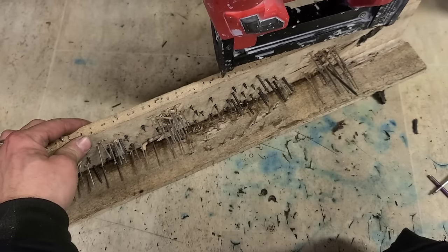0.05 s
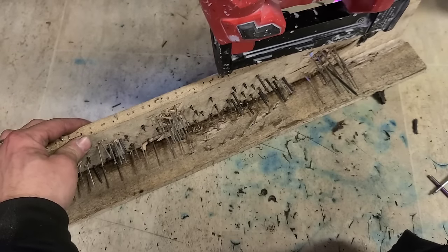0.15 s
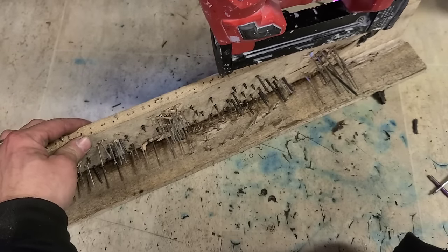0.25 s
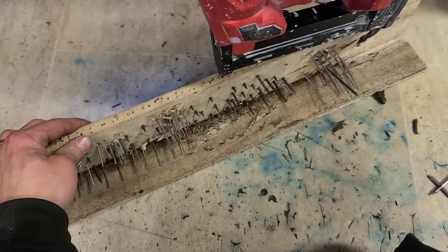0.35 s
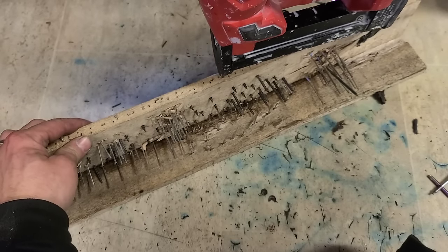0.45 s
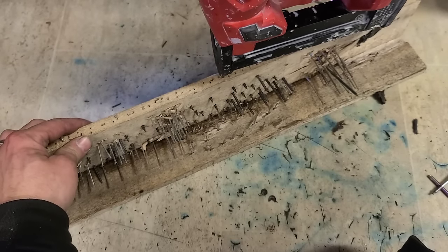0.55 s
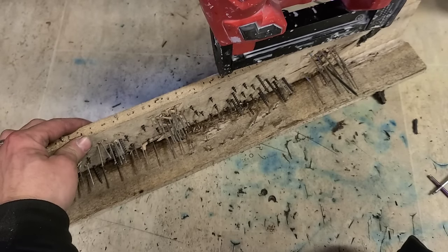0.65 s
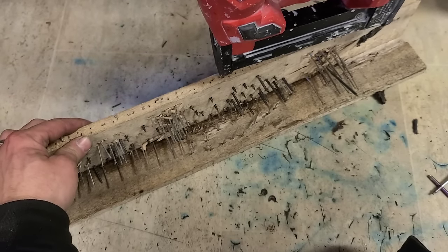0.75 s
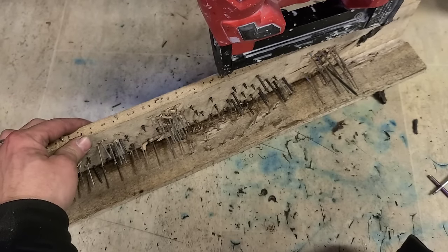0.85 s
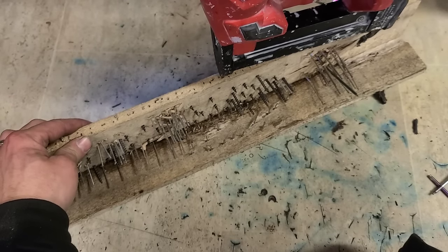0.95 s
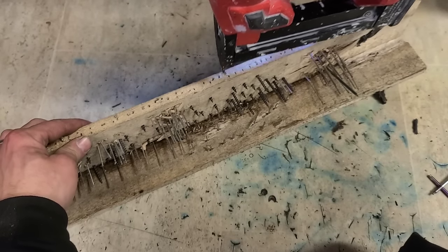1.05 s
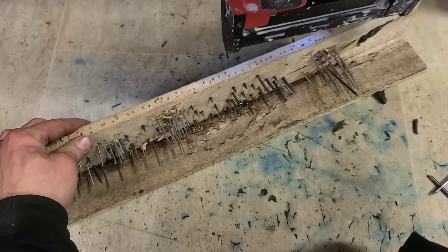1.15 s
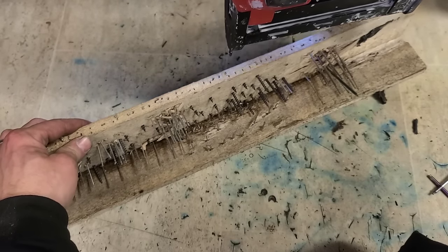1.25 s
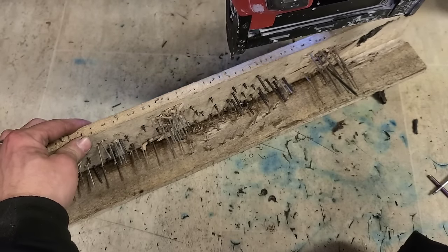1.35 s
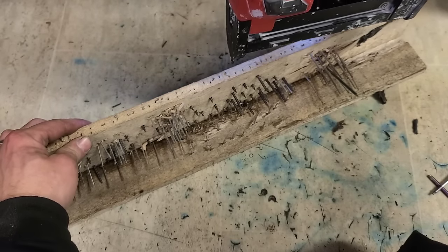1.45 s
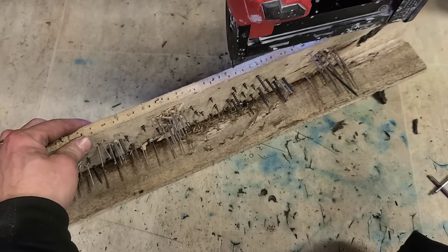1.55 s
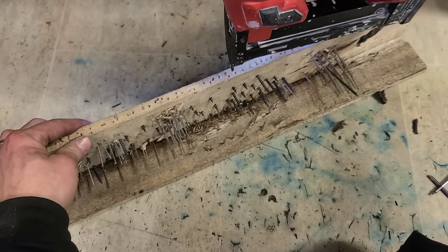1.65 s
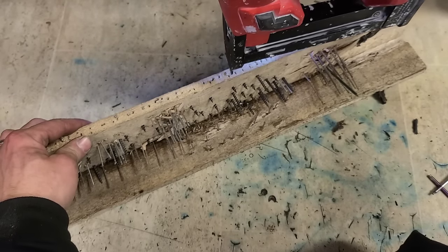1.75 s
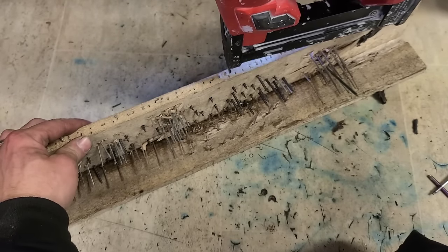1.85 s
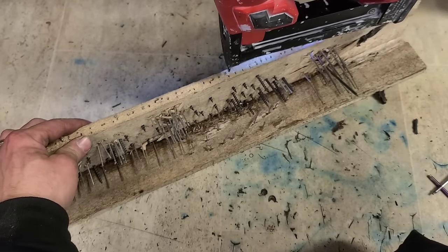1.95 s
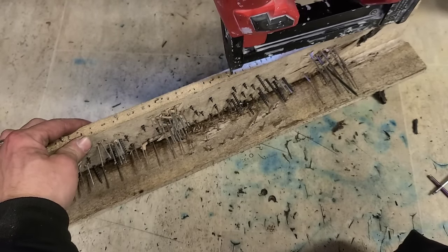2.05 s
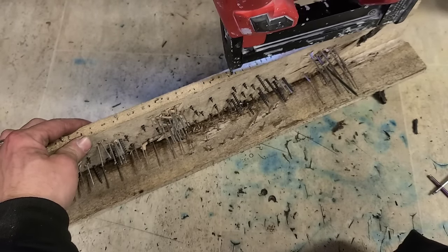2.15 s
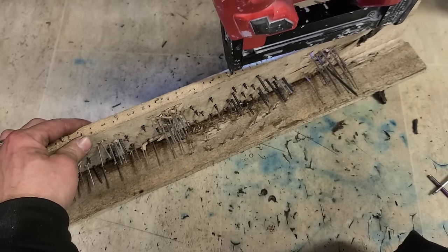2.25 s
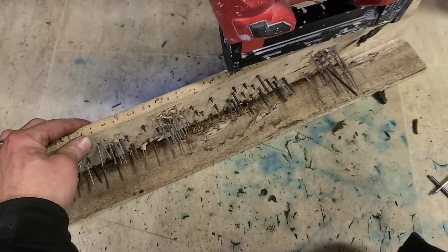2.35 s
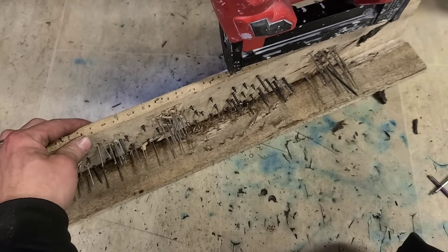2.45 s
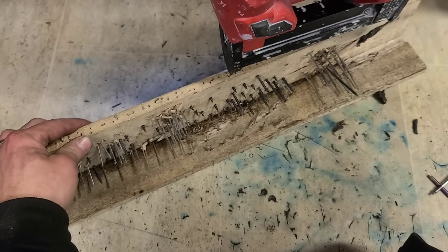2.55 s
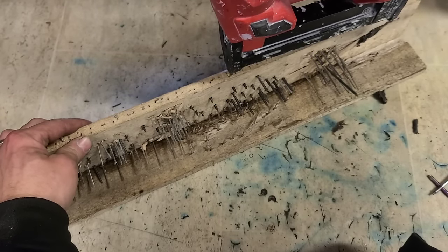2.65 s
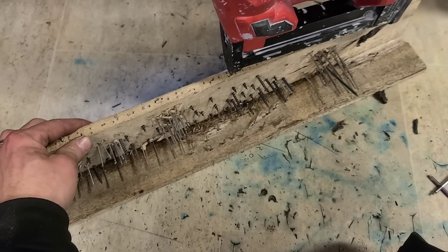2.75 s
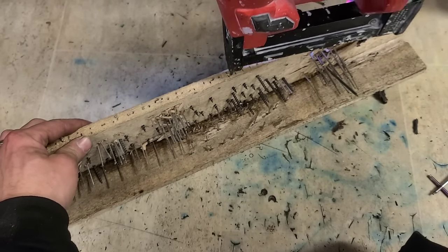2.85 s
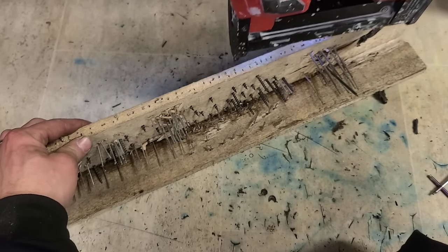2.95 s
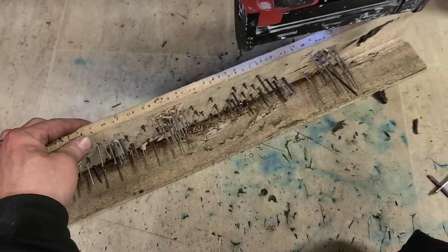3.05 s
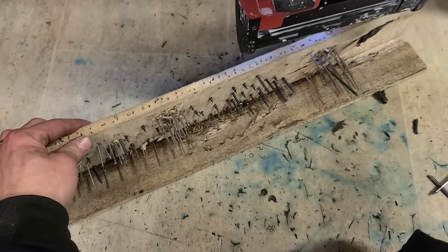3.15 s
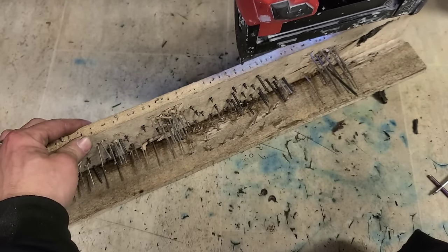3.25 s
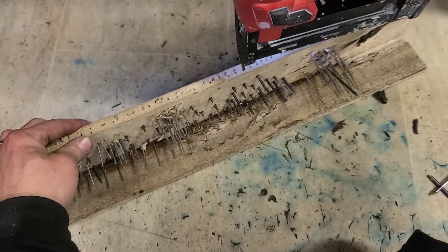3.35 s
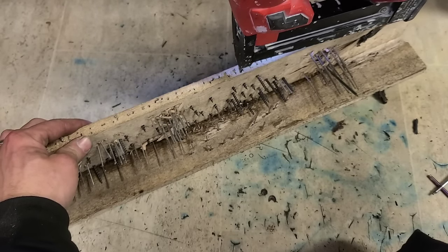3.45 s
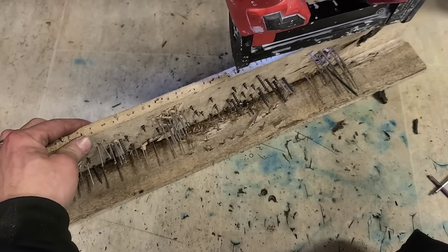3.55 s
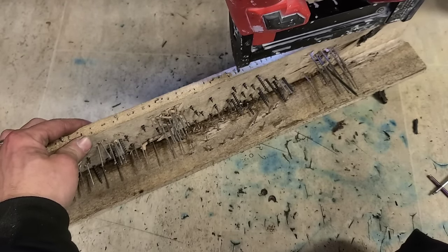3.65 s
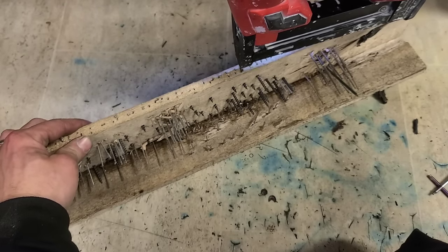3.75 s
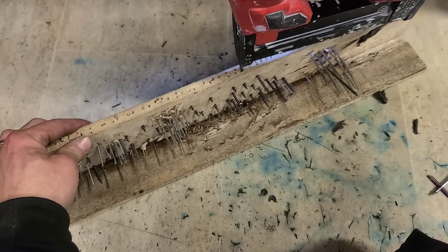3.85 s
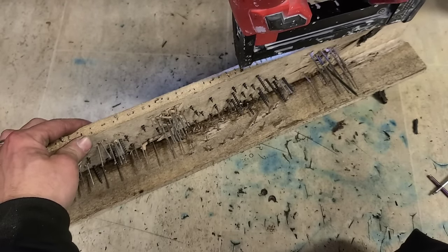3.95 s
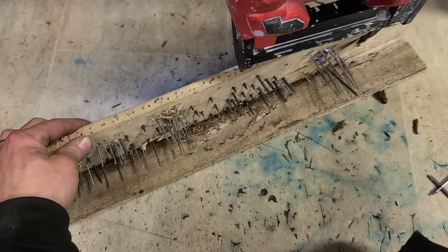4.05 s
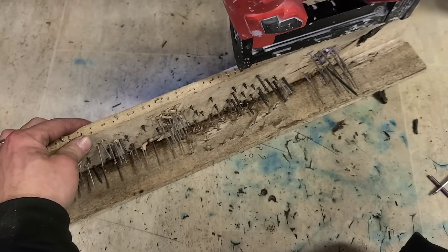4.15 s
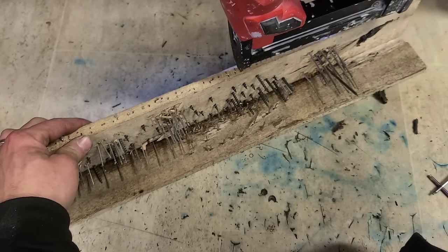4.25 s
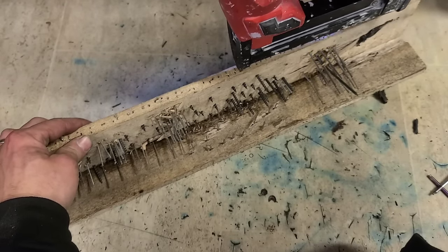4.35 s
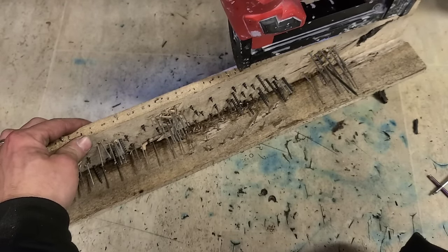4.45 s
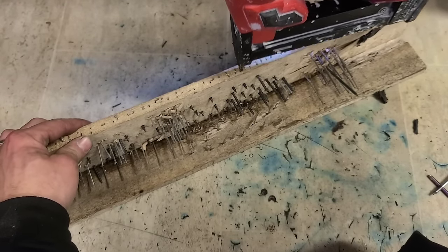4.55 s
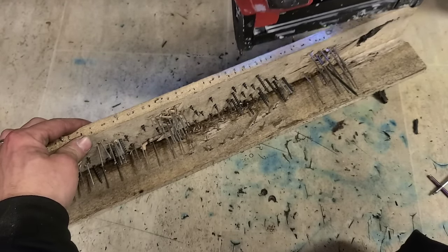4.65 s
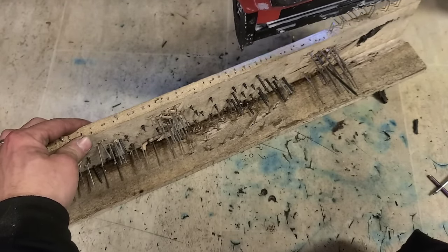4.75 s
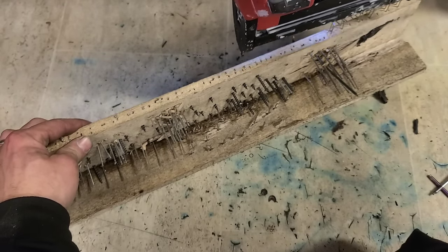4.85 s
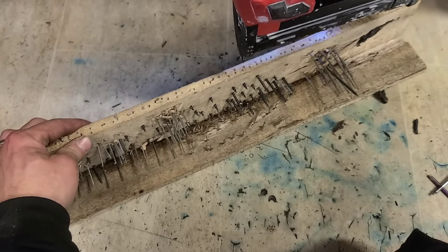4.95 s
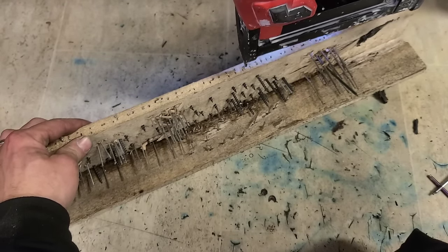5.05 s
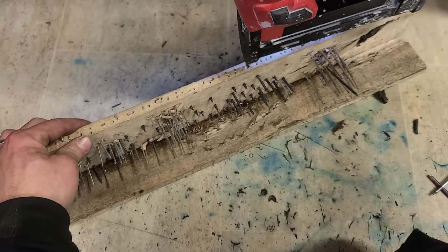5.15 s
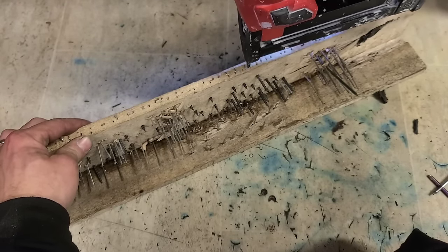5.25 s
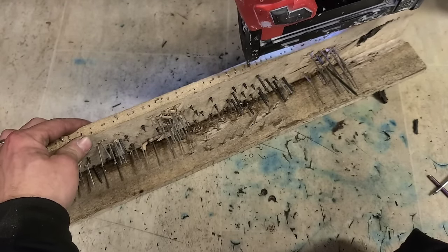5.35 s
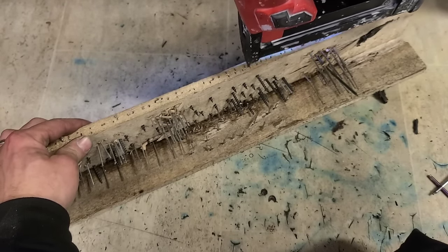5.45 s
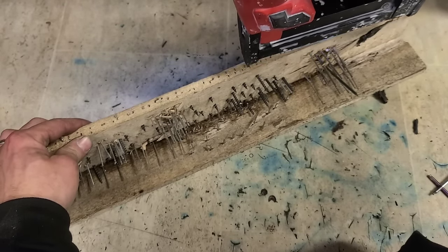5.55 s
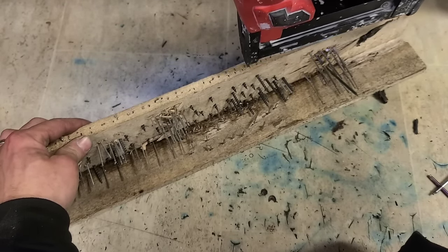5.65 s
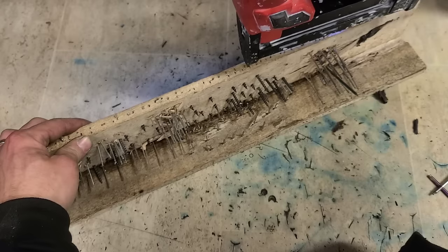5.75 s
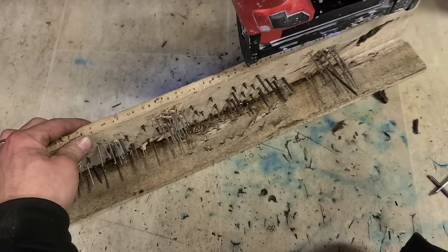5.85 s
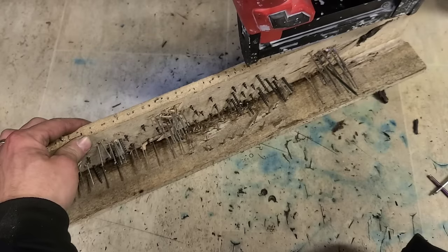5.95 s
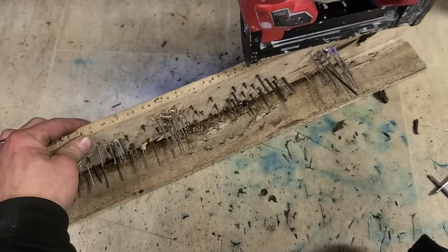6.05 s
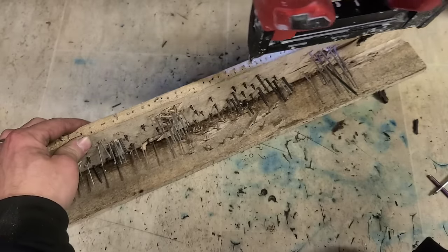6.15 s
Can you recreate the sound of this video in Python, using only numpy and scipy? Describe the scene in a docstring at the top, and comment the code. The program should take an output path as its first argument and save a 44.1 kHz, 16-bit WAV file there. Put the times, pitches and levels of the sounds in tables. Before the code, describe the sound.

A cordless stapler fires four sharp shots into wood, each with a brief motor whine, between soft thuds and trigger clicks.

```python
"""Cordless stapler in a small workshop

Two microphones close to a workbench: a stapler fires four times into a board, over a faint hum.
Each time its nose is set down with a thud and the trigger is squeezed. A geared motor races up
against the piston, the driver slams the staple home, the motor whines on to cock the tool, and the
trigger clicks back. The tool's steel, the bench and the room ring after each shot."""
import sys
import numpy as np
from scipy import signal
from scipy.fft import rfft, irfft
from scipy.io import wavfile

SR = 44100
rng = np.random.default_rng(int(sys.argv[2]) if len(sys.argv) > 2 else 0)


def transcribe(u):
    """Save the signal u as a 16-bit wav file named by the first command-line argument.

    u: samples, shape (n,) or (channels, n), limited to [-1, 1]; the rate is SR.
    q: integer samples, one column per channel.
    """
    v = np.clip(np.atleast_2d(u).T, -1, 1)
    q = np.round(v * 32767).astype(np.int16)
    wavfile.write(sys.argv[1], SR, q)


N = 273854

# the four shots: (motor start [s], level [dB], tooth rate factor [ratio])
SHOTS = [(0.721, 1.18, 0.99), (2.608, 0, 0.99), (4.297, -0.44, 0.98), (5.8017, -1.46, 0.99)]
# metal blows in each shot: (time after motor start [s], level [dB], t60 [s], treble lift [dB])
METAL_BLOWS = [(.001, -13, 0.023, 0.5), (.0073, -6, .026, -1.5), (.036, -16, .022, 0),
               (.046, -7.5, 0.025, 4.5), (0.0486, -9, .02, -5), (.124, -17, .035, 19), (.146, -23, .03, 12),
               (.164, -19, .0284, 6), (.171, -19.5, 0.03, 2)]
# struck steel: (frequency [Hz], level [dB])
STEEL_SPECTRUM = [(200, -22.5), (330, -14.5), (600, -16), (900, -16.5), (1300, 3.5), (1700, 6.5),
                  (2300, -10.5), (3100, 1), (4500, -4.5), (6400, -5), (8800, -12.5), (12000, -7.5),
                  (16000, -14)]
FIRE_S = .0468  # the driver lands this long after the motor starts


def stapler():
    """The tool, close up: each shot is a motor run with the blows of catch, driver and ratchet."""
    out = np.zeros((2, N))
    for s, db, speed in SHOTS:
        add(out, s, amp(db) * motor(speed))
        add(out, s + FIRE_S, amp(db - 5) * driver_crack(width_s=.0005))
        for after, blow_db, t60, lift_db in METAL_BLOWS:
            colour = [(hz, level + lift_db * np.log2(1 + hz / 7000)) for hz, level in STEEL_SPECTRUM]
            add(out, s + after, amp(db + blow_db) * burst(colour, t60, rise_s=.0007))
    return out


def driver_crack(width_s, size=600):
    """The driver slams the staple home: one short pressure pulse."""
    u = np.arange(size) / SR / width_s
    return -(1 - u) * np.exp(-u) * (1 - np.exp(-6 * u))


# partials of the gears: (multiple of the tooth rate [ratio], level [dB])
WHINE_PARTIALS = [(1, -2.5), (2, -4.5), (2.4, -11.5), (3, -13.5), (4, -11), (5, -10), (6, -13.5), (7, -22)]


def gear_whine(teeth):
    """Partials glide across the casing's modes, fluttering differently at each microphone."""
    size = len(teeth)
    whine = np.zeros((2, size))
    for microphone in whine:
        for k, db in WHINE_PARTIALS:
            flutter = 1 + .6 * (wander(110, size) + 1j * wander(110, size))
            microphone += amp(db) * (flutter * np.exp(2j * np.pi * (k * teeth + rng.random()))).real
    return unit(whine)


# clattering gears and rumbling casing: (frequency [Hz], level [dB])
GEAR_SPECTRUM = [(350, -26), (650, -6.5), (900, -9), (1250, 1), (1750, -6), (2200, 0), (3000, -1),
                 (3800, -4), (4400, -7), (7200, -6), (8600, -14), (10000, -16), (12000, -16), (16000, -13)]
CASING_SPECTRUM = [(60, -22.5), (120, 11.5), (170, 2), (240, -7), (380, 3), (500, 0), (650, -7.5),
                   (900, -14), (1500, -39.5)]
START_HZ, TOP_HZ, LOADED_HZ = 319.9, 1986.4, 1500  # tooth rate, before each shot's factor
TOP_S, COCK_S, COAST_S, BRAKE_S = .056, .12, .161, .17  # after motor start; power is cut at COAST_S
SAG_S, COAST_HZ_PER_S, COAST_DB_PER_S, BRAKE_DB_PER_S = .059, 15000, 450, 1098


def motor(speed, size=9000):
    """The motor races up against the piston, is relieved by the shot, sags while cocking, and brakes."""
    t = np.arange(size) / SR
    coasting, braking = np.maximum(t - COAST_S, 0), np.maximum(t - BRAKE_S, 0)
    racing_hz = START_HZ + (TOP_HZ - START_HZ) * t / TOP_S
    sagging_hz = LOADED_HZ + (TOP_HZ - LOADED_HZ) * np.exp(-np.maximum(t - TOP_S, 0) / SAG_S)
    hz = np.maximum(np.minimum(racing_hz, sagging_hz) - COAST_HZ_PER_S * coasting, 1)
    drive = hz / TOP_HZ * amp(-BRAKE_DB_PER_S * braking)
    teeth = np.cumsum(hz * speed * (1 + .006 * wander(300, size))) / SR

    # the gears strain before the shot and again as the tool cocks
    strain = np.minimum(t / .023, 1) * np.exp(-np.maximum(t - FIRE_S, 0) / .01)
    cocking = np.clip((t - COCK_S) / .017, 0, 1)
    shake = np.exp(-((t - FIRE_S - .0075) / .0087) ** 2)  # hardest just after the driver lands
    whine_db = -24.5 + 5.5 * cocking - COAST_DB_PER_S * coasting  # without power the whine fades first
    gears_db = -23.5 + 12 * strain + 2 * cocking
    casing_db = -29.5 + 16 * shake

    whine = amp(whine_db) * gear_whine(teeth)
    meshing = 1 + .4 * np.cos(2 * np.pi * teeth)
    clatter = unit(amp(3 * wander(400, size)) * meshing)  # uneven, once at each mesh
    rumble = drive * flicker(3.4, 120, size)
    gears = amp(gears_db) * clatter * noise(GEAR_SPECTRUM, size)
    casing = amp(casing_db) * rumble * noise(CASING_SPECTRUM, size)
    return drive * (whine + gears + casing)


# the tool's steel parts: (frequency [Hz], gain at resonance [dB])
STEEL_MODES = [(1073, -10.5), (1320, 0), (1720, -7), (1959, -6.5), (2502, -9.5), (2656, -4), (2907, -5.5),
               (3150, -0.5), (3230, -2), (3298, -6), (3748, -3), (4740, -4.5), (6290, -2), (7830, 1.5),
               (7890, 1.5), (7960, 1), (9380, 2.5)]


def steel_ring(x, t60=.21):
    """Steel parts pick up the blows and the passing whine, and ring on after the motor stops."""
    radius = np.exp(-np.log(1000) / (t60 * SR))
    out = np.zeros_like(x)
    for hz, db in STEEL_MODES:
        pole = radius * np.exp(2j * np.pi * hz / SR)
        out += 2 * amp(db) * signal.lfilter([1 - radius], [1, -pole], x + 1e-12).real
    return out


# the nose lands: (time [s], knock [dB], thud [dB], scrape [dB], tip's lead [s], tip's tick [dB])
NOSE_LANDINGS = [(0.1459, -21.5, -7, -43.5, .018, -57), (2.2952, -21.5, -6, -41, .014, -50.5),
                 (4.0128, -29, -9, -49, .014, -52), (5.4856, -29.5, -10.5, -50, 0.033, -60)]
# the tool is tapped and shifted while aiming: (time [s], knock [dB], tick [dB], thud [dB])
AIMING_TAPS = [(0.064, -46.5, -77, -50.5), (0.594, -43, -62, -47), (2.083, -41, -57.5, -28.5),
               (2.125, -42, -48.5, -59.5), (2.246, -44, -72, -59.5), (3.348, -61, -89, -67),
               (3.81, -43.5, -52, -39.5), (3.845, -46.5, -88, -59), (3.931, -46, -70, -36),
               (4.076, -40.5, -79.5, -54.5), (5.255, -52, -57.5, -60.5), (5.348, -62, -85, -40.5),
               (5.414, -45.5, -78, -41)]
# the board's knock: (frequency [Hz], level [dB])
BOARD_SPECTRUM = [(100, -15), (220, -1.5), (380, 8), (550, -7.5), (850, -1), (1400, -4.5), (2600, -3),
                  (3300, -11), (4500, -20.5), (9000, -41)]


def handling():
    """The nose scrapes and knocks on the wood as its safety tip slides in; light taps while aiming."""
    out = np.zeros((2, N))
    for s, knock_db, _, scrape_db, lead_s, tip_db in NOSE_LANDINGS:
        grate = nose_scrape(fade_s=.017)
        add(out, s - grate.shape[1] / SR / 2, amp(scrape_db) * grate)
        add(out, s, amp(knock_db) * burst(BOARD_SPECTRUM, t60=.035, rise_s=.0005))
        add(out, s - lead_s, click(knock_db - 13.5, tip_db))  # the tip touches
        add(out, s + .013, click(knock_db - 10, knock_db - 25))  # and latches
    for s, knock_db, tick_db, _ in AIMING_TAPS:
        add(out, s, click(knock_db, tick_db))
    return out


def nose_scrape(fade_s, size=9000):
    """The steel nose grates on the wood as it lands and settles: a grainy swell."""
    t = np.arange(size) / SR
    swell = np.exp(-abs(t - t[-1] / 2) / fade_s) * signal.windows.tukey(size)
    return swell * flicker(5.5, 250, size) * noise(PLASTIC_SPECTRUM, size)


# the finger takes up the trigger's slack: (time [s], knock [dB], tick [dB])
TRIGGER_GRIPS = [(.646, -42.5, -66.5), (2.533, -40.5, -52.5), (4.233, -44, -66), (5.722, -43.5, -65.5)]
# it presses home, and later lets go: (time [s], knock [dB], thud [dB])
TRIGGER_PRESSES = [(.663, -39.5, -30.5), (2.563, -36.5, -27), (4.253, -53.5, -36.5), (5.738, -46, -33)]
TRIGGER_RELEASES = [(1.039, -33, -30.5), (2.895, -33.5, -39), (4.563, -34, -31), (6.119, -31.5, -30)]


def trigger(switch_lead_s=.0205, step_s=.0122, rebound_s=.016):
    """The trigger clicks its way in before each shot and springs back with a rebound after it."""
    out = np.zeros((2, N))
    for s, knock_db, tick_db in TRIGGER_GRIPS:
        add(out, s, click(knock_db, tick_db))
    for s, knock_db, _ in TRIGGER_PRESSES:
        add(out, s, click(knock_db, knock_db - 16))
    for s, _, _ in SHOTS:
        for k in range(3):  # counted back from the switch, the loudest click
            add(out, s - switch_lead_s - k * step_s, click(-33.5 - 3 * k, -34.5 - 6 * k))
    for s, db, _ in TRIGGER_RELEASES:
        add(out, s, click(db, db + .5))
        add(out, s + rebound_s, amp(-5) * click(db, db + .5))
    return out


# knocked plastic and ticking spring steel: (frequency [Hz], level [dB])
PLASTIC_SPECTRUM = [(150, -12), (400, 2), (600, -10), (850, -0.5), (1400, -2), (2000, -1), (2500, -2.5),
                    (3200, 1.5), (4200, -17.5), (6000, -20), (10000, -38)]
SPRING_SPECTRUM = [(2500, -29.5), (4500, 4), (7000, -1), (9000, -1), (13000, -3.5), (16000, -17)]


def click(knock_db, tick_db):
    """A small rattly click: a plastic knock with a bright tick of spring steel."""
    knock = burst(PLASTIC_SPECTRUM, t60=.045, rise_s=.0018)
    tick = burst(SPRING_SPECTRUM, t60=.034, rise_s=.0013)
    chatter = flicker(3.8, 350, knock.shape[1])  # loose parts touch several times
    return chatter * (amp(knock_db) * knock + amp(tick_db) * tick)


# each shot's kicks into the board: (time after motor start [s], level [dB], cut-off [Hz])
SHOT_KICKS = [(.041, -25, 417), (.056, -12.5, 241), (.075, -27, 403), (0.109, -33, 300), (.155, -37.5, 396),
              (0.195, -24, 110)]


def bench():
    """The bench under the tool thuds as the nose lands, the hand pushes and each shot kicks."""
    out, push = np.zeros((2, N)), thud(cut_hz=115)
    for s, _, db, *_ in NOSE_LANDINGS:
        add(out, s, amp(db) * push)
    for s, *_, db in AIMING_TAPS + TRIGGER_PRESSES + TRIGGER_RELEASES:
        add(out, s, amp(db) * push)
    for s, _, _ in SHOTS:
        for after, kick_db, cut_hz in SHOT_KICKS:
            add(out, s + after, amp(kick_db) * thud(cut_hz))
    return out


# board and bench together: (frequency [Hz], level [dB], t60 [s])
BENCH_MODES = [(34.5, -22, 1), (58, -2.5, 0.14), (78.6, -1, 0.23), (132, -15.5, 0.22), (160.5, -15.5, 0.39),
               (217, -12, .12), (297, -11, 0.3), (374, -10, .24), (490, -15.5, 0.24)]


def thud(cut_hz):
    """The bench rings; a soft push leaves out the high modes, and neighbouring modes beat."""
    t = np.arange(SR) / SR
    ring = np.zeros(SR)
    for k, (hz, db, t60) in enumerate(BENCH_MODES):
        excitation = (-1) ** k / np.hypot(1, (hz / cut_hz) ** 3)
        ring += excitation * amp(db - 60 * t / t60) * np.sin(2 * np.pi * hz * t)
    return -ring * (1 - np.exp(-t * cut_hz * 4))


# colour of the workshop's reflections: (frequency [Hz], level [dB])
REFLECTION_SPECTRUM = [(40, 1.5), (300, 1.5), (3000, -2.5), (8000, -3), (16000, -5)]
# their decay: (frequency [Hz], t60 [s])
ROOM_DECAY = [(100, 0.6), (400, 0.33), (1500, 0.25), (4000, 0.29), (8000, 0.25), (11000, 0.37),
              (15000, .19)]


def workshop(x, size=30000):
    """The small room around the microphones: dense reflections, each band dying at its own speed."""
    hz, t, bands = signal.stft(noise(REFLECTION_SPECTRUM, size), SR, nperseg=256)
    decay = amp(-60 * t / read(ROOM_DECAY, hz)[:, None])
    tail = signal.istft(bands * decay, SR, nperseg=256)[1]
    tail *= 1 - np.exp(-(np.arange(tail.shape[1]) / SR / .005) ** 2)  # first reflections arrive late
    return signal.fftconvolve(x, tail / np.linalg.norm(tail[0]), axes=1)[:, :N]


# a low hum and the room's resonant tones, the room's steady air and a high hiss: (frequency [Hz], level [dB])
STEADY_TONES = [(102.3, -61.5), (199, -79), (247.6, -68.5), (262, -69), (333.8, -67), (376.8, -75),
                (412, -87.5), (502, -75.5), (721.4, -76.5), (807.5, -82.5), (1023, -83), (1114, -88),
                (1384, -87.5)]
AIR_SPECTRUM = [(15, -33), (34, 4), (55, -9.5), (90, -6), (108, -2.5), (128, -25), (175, -20), (255, -9),
                (350, -14), (490, -20), (560, -27.5), (730, -17.5), (1050, -25.5), (2500, -35),
                (8000, -52.5)]
HISS_SPECTRUM = [(3000, -18), (6000, -15.5), (9000, -15), (9900, 4.5), (10300, -4), (11200, -12),
                 (16000, -15)]


def background():
    """Room tone: a wavering hum and the room's resonant tones in moving air, with a thin high hiss."""
    t = np.arange(N) / SR
    hum = np.zeros(N)
    for hz, db in STEADY_TONES:
        peak = np.sqrt(2) * amp(db + 1.3 * wander(3, N))
        hum += peak * np.sin(2 * np.pi * hz * t + .28 * wander(2.7, N))
    return hum + amp(-58.5) * noise(AIR_SPECTRUM, N) + amp(-83.5) * noise(HISS_SPECTRUM, N)


# likeness of the two microphones: (frequency [Hz], correlation [0 to 1])
MIC_CORRELATION = [(30, 1), (120, 1), (300, .97), (420, .75), (560, .15), (1000, .12), (3000, .02),
                   (16000, 0)]


def noise(spectrum, size):
    """Coloured noise of rms 1 at the two microphones, alike in the bass."""
    hz = np.fft.rfftfreq(size, 1 / SR)
    mid, side = rfft(rng.standard_normal((2, size)))
    same = read(MIC_CORRELATION, hz)
    mid, side = mid * np.sqrt(1 + same), side * np.sqrt(1 - same)
    return unit(irfft(np.array([mid + side, mid - side]) * amp(read(spectrum, hz)), size))


def burst(spectrum, t60, rise_s, size=6000):
    """A blow on a part with many close, quickly dying modes."""
    t = np.arange(size) / SR
    return noise(spectrum, size) * (1 - np.exp(-t / rise_s)) * amp(-60 * t / t60)


def wander(rate_hz, size):
    """A smooth random curve of rms 1."""
    hz = np.fft.rfftfreq(size, 1 / SR)
    return unit(irfft(rfft(rng.standard_normal(size)) / (1 + (hz / rate_hz) ** 4), size))


def flicker(depth_db, rate_hz, size):
    """An uneven gain of rms 1."""
    return unit(amp(depth_db * wander(rate_hz, size)))


def amp(db):
    """Decibels to gain."""
    return 10 ** (np.asarray(db) / 20)


def unit(x):
    """Scales to rms 1."""
    return x / np.sqrt(np.mean(x ** 2) + 1e-20)


def read(points, hz):
    """Reads a table on a log-frequency axis."""
    f, value = np.transpose(points)
    return np.interp(np.log(hz + 1), np.log(f + 1), value)


def add(mix, s, sound):
    """Mixes a sound in at time s."""
    part = mix[:, max(round(s * SR), 0):][:, :sound.shape[-1]]
    part += sound[..., :part.shape[1]]


def scene():
    """Tool and bench up close, the room behind; light handling shakes the steel less than a shot."""
    shots, clicks, thuds = stapler(), trigger() + handling(), bench()
    tool = shots + clicks + steel_ring(shots + amp(-8) * clicks)
    room = workshop(amp(-13) * shots + amp(-12) * clicks + amp(-20.5) * thuds)
    thuds[1] = np.roll(thuds[1], shift=9)  # the right microphone is slightly farther from the bench
    return tool + thuds + room + background()


def record(dry):
    """Both channels clip at full scale and are band-limited to 16 kHz."""
    lowpass = signal.firwin(401, 16000, window=("kaiser", 8), fs=SR)
    return signal.oaconvolve(np.clip(dry, -1, 1), lowpass[None], "same", axes=1)


dry = scene()
out = record(dry)
transcribe(out)
```